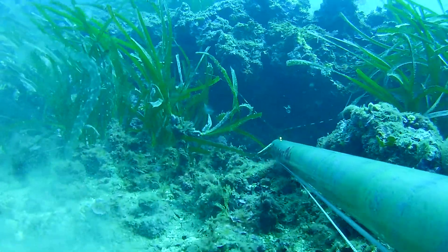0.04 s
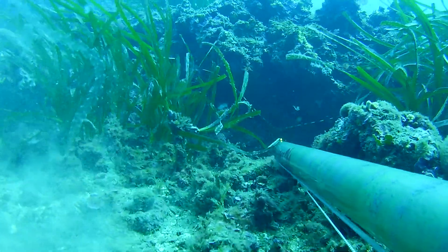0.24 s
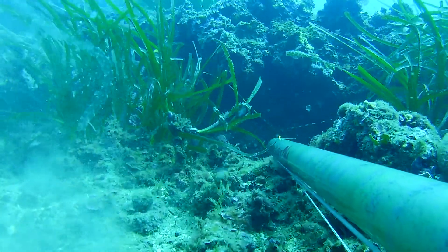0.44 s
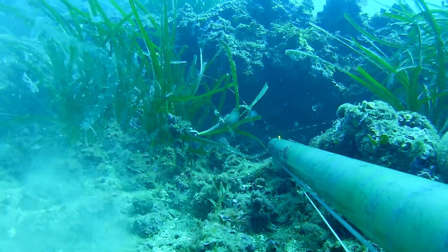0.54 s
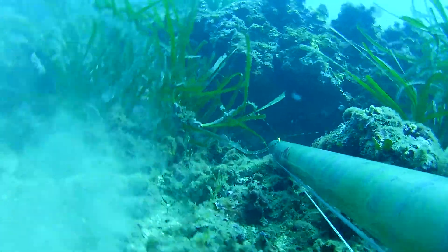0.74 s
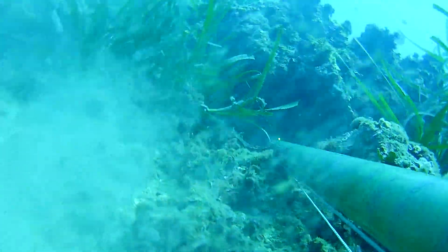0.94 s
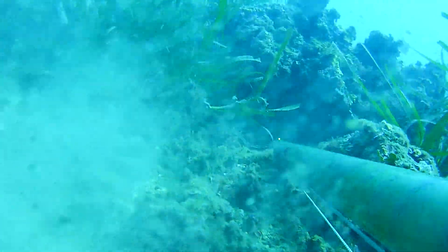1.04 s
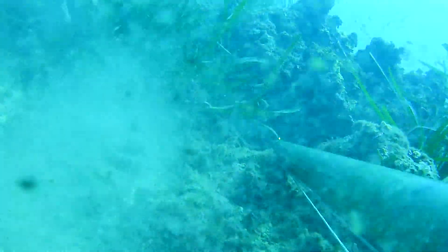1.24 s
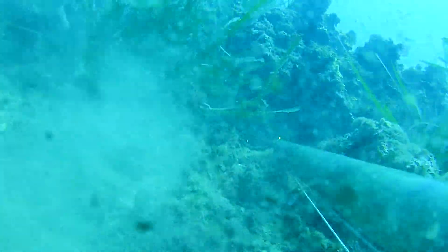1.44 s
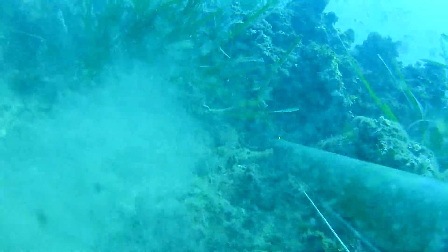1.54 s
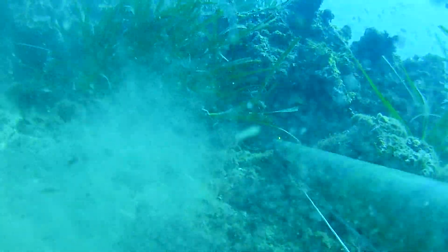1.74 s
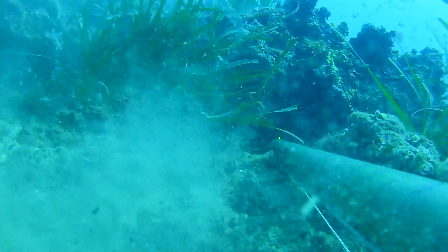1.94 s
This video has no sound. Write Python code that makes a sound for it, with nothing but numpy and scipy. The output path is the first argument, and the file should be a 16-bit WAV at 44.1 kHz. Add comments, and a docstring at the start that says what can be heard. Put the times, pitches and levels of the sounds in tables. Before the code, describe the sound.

Close underwater knocks from a speargun being shifted come in three short bunches, with brief metallic ringing, dull bumps and faint gritty scrapes. Behind them a faraway boat motor drones steadily, and it is left alone at the end.

```python
"""A distant boat motor hums under water, and almost at once a speargun knocks and scrapes on the sea bed.
As the gun is shifted, impacts excite the modes of its steel shaft and of a camera housing fixed to it.
Sliding parts make friction noise, and each shove sets the barrel wobbling in its lowest bending modes.
The motor, a harmonic series over a rush that throbs once a turn, goes on throughout and slowly grows."""
import sys
import numpy as np
from scipy import signal
from scipy.fft import rfft, irfft
from scipy.io import wavfile
from scipy.ndimage import uniform_filter1d

SR = 44100
rng = np.random.default_rng(int(sys.argv[2]) if len(sys.argv) > 2 else 0)


def master_out(mix):
    """Clip the mix to full scale and print it as 16-bit PCM to the path in sys.argv[1]."""
    frames = np.transpose(np.atleast_2d(mix))
    ceiling = np.clip(frames, -1, 1)
    pcm = np.round(ceiling * 32767).astype(np.int16)
    wavfile.write(sys.argv[1], SR, pcm)


N = 88200


def knocks():
    """Impact excitation: housing, fittings and shaft ring freely; a softer contact gives a duller clack. The
    faint rows at 0.821, 1.435 and 1.462 s are hollow rubs rather than blows, voiced the same way."""
    # Each row: start in seconds, clack gain in dB, clack cutoff in Hz, hollow ring gain in dB,
    # ring pitch in Hz, shaft gain in dB.
    contacts = [(.2401, -21, 6000, -48, 730, -56), (.2428, -22, 1720, -45, 705, -20.5),
                (.2492, -17, 6000, -25.5, 722, -25.5), (.256, -16.5, 4500, -38, 720, -28),
                (.2922, -16.5, 1935, -22, 691, -35), (.513, -40, 1220, -38.5, 750, -40.5),
                (.6015, -18, 1560, -19.5, 525, -52.5), (.605, -14.5, 1020, -46, 664, -53.5),
                (.611, -32.5, 790, -18.5, 666, -59), (.653, -36, 1505, -33.5, 692, -47),
                (.6812, -12, 2850, -7.5, 693.2, -55.5), (.6855, -41, 1113, -14.5, 665, -58),
                (.706, -20, 1840, -13.5, 688, -62), (.821, -33.5, 1100, -36, 710, -59),
                (1.051, -23.5, 750, -28, 657, -60), (1.081, -55, 1100, -27.5, 717, -52),
                (1.095, -25, 2040, -30, 572, -61), (1.1036, -18.5, 3040, -21.5, 597, -33),
                (1.1138, -31, 4830, -22, 702, -45), (1.125, -36, 1300, -37, 684, -40),
                (1.1605, -34, 1100, -36, 723, -67), (1.1875, -29.5, 970, -36.5, 740, -53),
                (1.218, -32.5, 1590, -36.5, 699, -53), (1.247, -40, 1410, -63, 673, -63),
                (1.278, -44, 1500, -44, 673, -54), (1.435, -37, 1000, -37, 640, -60),
                (1.462, -54, 1000, -35.5, 679, -68)]
    # Each row: mode frequency in Hz, relative level in dB, time to fall 60 dB in seconds.
    housing_modes = [(336, -30.5, 0.22), (503, -22, 0.075), (773.4, -21, 0.11), (1082, -14.5, 0.043),
                     (1191, -22.5, 0.15), (1436, -12, 0.044), (1710, -29, 0.042), (2030, -14.5, 0.027),
                     (2231, -18.5, 0.054), (3130, -41.5, 0.017), (4353, -25, .04)]
    shaft_modes = [(1225, -12.5, 0.31), (1455, -15.5, 0.18), (1636, 4, 0.04), (2159, -11.5, 0.076),
                   (3195, -25, 0.27), (3440, -28, 0.12), (4720, -27, .04), (7080, -35, 0.057)]
    # The fittings' clatter. Each row: frequency in Hz, relative spectral density in dB.
    clatter_spectrum = [(60, -8), (300, -10), (600, 12), (1100, 2), (1700, 2), (2700, -3.5), (3800, -14),
                        (4800, -13), (6000, -37), (7100, -17.5), (8000, -23.5), (9000, -9.5),
                        (11000, -26.5), (15000, -33)]
    t = np.arange(SR // 2) / SR
    housing, shaft = struck_modes(t, housing_modes), struck_modes(t, shaft_modes)
    burst, tail = amp(-9.5) * decay(t, t60=0.022), amp(-27) * decay(t, t60=0.24)
    track = np.zeros(N)
    for start, clack_db, cutoff_hz, ring_db, ring_hz, shaft_db in contacts:
        clatter = colour(rng.standard_normal(len(t)), clatter_spectrum) * (burst + tail)
        clack = signal.lfilter(*signal.butter(2, cutoff_hz, fs=SR), housing + clatter)
        ring = mode(t, ring_hz, t60=0.066, rise_s=0.0031)
        add(track, start, amp(clack_db) * clack + amp(ring_db) * ring + amp(shaft_db) * shaft)
    return track


def shoves():
    """Bending vibration: after a soft thud the barrel wobbles in its two lowest modes."""
    # Each row: start in seconds, thud gain in dB, thud pitch in Hz, flex gain in dB, sway gain in dB.
    pushes = [(.247, -24, 146, -36.5, -50), (.2605, -20.5, 102, -20, -23.5),
              (.2725, -21.5, 62.3, -41.5, -35), (.318, -27, 74.3, -25.5, -24.5), (.345, -38, 141, -48, -58),
              (.412, -61, 109, -31, -53), (.517, -40, 134, -26.5, -31), (.572, -41, 103, -44, -40),
              (.613, -30, 138.5, -30, -46.5), (.638, -33.5, 132, -26.5, -44.5),
              (.686, -33.5, 204, -55.5, -26), (.77, -59, 97.6, -32.5, -44), (.83, -43.5, 108, -37, -34),
              (.925, -50.5, 121, -44, -40), (.98, -44, 116, -42.5, -46), (1.064, -39, 118, -33, -55),
              (1.10, -30.5, 125, -41, -40), (1.128, -37.5, 130, -30, -32), (1.183, -26, 204, -30, -33),
              (1.265, -67, 140, -43, -36), (1.365, -38.5, 139, -40.5, -47), (1.43, -57, 144, -46.5, -36.5)]
    peak_cycles, rise_s = 0.72, 0.0026
    t = np.arange(SR) / SR
    track = np.zeros(N)
    for start, thud_db, thud_hz, flex_db, sway_db in pushes:
        age = t * thud_hz / peak_cycles  # the thud's envelope peaks at age 1
        thud = age ** 2 * np.exp(2 - 2 * age) * np.sin(2 * np.pi * thud_hz * t)
        flex = mode(t, hz=79.8, t60=0.22, rise_s=rise_s)
        sway = mode(t, hz=37.95, t60=0.41, rise_s=rise_s)
        add(track, start, amp(thud_db) * thud + amp(flex_db) * flex + amp(sway_db) * sway)
    return track


def ticks():
    """Damped resonance: each tiny hard contact rings briefly in a narrow, high band."""
    # Each row: start in seconds, level in dB, pitch in Hz.
    contacts = [(.249, -36, 3570), (.2492, -49, 7180), (.6795, -37, 4430), (.7055, -49.5, 4500),
                (.7925, -58.5, 6600), (1.1045, -30, 2250), (1.1142, -30, 2220), (1.1142, -56, 4600),
                (1.105, -61, 8400), (1.114, -65, 8200), (1.149, -58, 5500)]
    half_width = 0.11  # fraction of the pitch
    t = np.arange(SR // 10) / SR
    track = np.zeros(N)
    for start, db, hz in contacts:
        band = signal.butter(2, [hz * (1 - half_width), hz * (1 + half_width)], "band", fs=SR)
        ring = unit(signal.lfilter(*band, rng.standard_normal(len(t))))
        add(track, start, amp(db) * ring * decay(t, t60=0.019))
    return track


def scrapes():
    """Sliding friction: gritty noise, its level flickering at random, swells and fades."""
    # Each row: start in seconds, length in seconds, level in dB, pitch in Hz.
    slides = [(.199, 0.012, -54, 1620), (.212, 0.043, -51.5, 1490), (.509, 0.036, -57, 1560),
              (.75, 0.094, -53.5, 990), (.931, 0.029, -50.5, 1740), (1.089, 0.0067, -42, 1700),
              (1.116, .022, -46, 1500), (1.27, 0.081, -49.5, 1400), (1.35, 0.028, -49, 2060)]
    # Each row: multiple of the pitch, relative spectral density in dB.
    friction_spectrum = [(.07, -28), (.3, -16), (.5, -0.5), (.7, -3.5), (1, 2), (1.4, -17), (2.4, -29.5),
                         (9, -44.5)]
    grain_db = 5
    t = np.arange(SR // 4) / SR
    track = np.zeros(N)
    for start, length, db, hz in slides:
        grains = amp(grain_db * wander(len(t), span=80))
        spectrum = [(multiple * hz, level) for multiple, level in friction_spectrum]
        grit = colour(grains * rng.standard_normal(len(t)), spectrum)
        swell = np.sin(np.pi * np.minimum(t / length, 1))
        add(track, start, amp(db) * swell * grit)
    return track


def motor():
    """Periodic excitation: rotation gives harmonics of the turning rate and modulates a rush of noise."""
    # Each row: time in seconds, turns per second, then gains in dB of hum, treble, drone and whine.
    running = [(0, 30.3, -3, -3, -13, -2.5), (0.201, 30.0, -3, -3, -8, 3),
               (0.598, 29.95, -3.5, -4, -3.5, -2.5), (1.0, 29.8, -0.5, -5, -6, -4),
               (1.448, 29.7, -1.5, 0.5, 1.5, 0.5), (1.649, 29.6, -1.5, 1, 0.5, -1),
               (1.85, 29.54, -1.5, 2.5, -2.5, 6), (2, 29.5, 0, 2.5, -6, 5.5)]
    # The rush as the water carries it. Each row: frequency in Hz, relative spectral density in dB.
    rush_spectrum = [(20, 3.5), (100, -1.5), (180, 0), (310, 1.5), (440, -1.5), (670, 2.5), (800, -8.5),
                     (1300, -10.5), (1550, -9), (1740, -2), (1930, -14.5), (2080, -9), (2250, -12.5),
                     (2420, -6.5), (2800, -16), (3400, -14.5), (3900, -26.5), (4330, -15), (4720, -27),
                     (5020, -16.5), (5300, -21.5), (5570, -19), (6000, -27.5), (8000, -31), (15000, -52)]
    # Each row: number of a strong harmonic, its level in dB ahead of the band gains.
    strong_harmonics = [(6, -58), (9, -64), (12, -66.5), (20, -65.5), (22, -57), (23, -54.5), (24, -61),
                        (56, -68), (58, -66), (60, -60.5), (72, -70.5), (85, -68.5)]
    rush_gain, tonal_share, waver_depth, throb_depth = amp(-50), 0.49, 0.0011, 0.41
    drone_hz, whine_hz, split_hz = (590, 780), (1600, 1890), 2600
    t = np.arange(N) / SR
    times, *curves = np.transpose(running)
    turn_hz, hum_db, treble_db, drone_db, whine_db = (np.interp(t, times, curve) for curve in curves)
    turns = np.cumsum(turn_hz * (1 + waver_depth * wander(N, span=3000))) / SR
    gains = spectral_gain(np.arange(1, 215) * turn_hz.mean(), rush_spectrum)
    gains *= rush_gain * np.sqrt(tonal_share) / np.linalg.norm(gains)
    for number, db in strong_harmonics:
        gains[round(number) - 1] = amp(db)
    phases = np.exp(2j * np.pi * rng.random(len(gains)))
    one_turn = irfft(np.r_[0, gains * phases], N) * N / np.sqrt(2)
    harmonics = np.interp(turns % 1, np.arange(N) / N, one_turn)
    rush = rush_gain * np.sqrt(1 - tonal_share) * colour(rng.standard_normal(N), rush_spectrum)
    sound = harmonics + rush * (1 + throb_depth * np.cos(2 * np.pi * turns))
    for band_hz, band_db in (drone_hz, drone_db), (whine_hz, whine_db):
        band = signal.filtfilt(*signal.butter(2, band_hz, "band", fs=SR), sound)
        sound += (amp(band_db) - 1) * band
    hum = signal.filtfilt(*signal.butter(2, split_hz, fs=SR), sound)
    return amp(hum_db) * hum + amp(treble_db) * (sound - hum)


def struck_modes(t, table):
    """Modal superposition: resonances struck together add, here with alternating signs."""
    return sum((-1) ** k * amp(db) * mode(t, hz, t60, rise_s=0.0012)
               for k, (hz, db, t60) in enumerate(table))


def mode(t, hz, t60, rise_s):
    """A damped oscillator builds up and dies away."""
    return np.sin(2 * np.pi * hz * t) * decay(t, t60) * (1 - np.exp(-t / rise_s))


def decay(t, t60):
    """Exponential damping: 60 dB down in t60 seconds."""
    return np.exp(-np.log(1000) * t / t60)


def colour(x, spectrum):
    """Spectral shaping: x filtered by the spectrum, at rms 1."""
    hz = np.fft.rfftfreq(len(x), 1 / SR) + 1
    return unit(irfft(rfft(x) * spectral_gain(hz, spectrum), len(x)))


def spectral_gain(hz, spectrum):
    """Frequency response: (Hz, dB) points joined on a logarithmic frequency axis."""
    points_hz, db = np.transpose(spectrum)
    return amp(np.interp(np.log(hz), np.log(points_hz), db))


def wander(size, span):
    """Random fluctuation: noise averaged over span samples, at rms 1."""
    return unit(uniform_filter1d(rng.standard_normal(size), span))


def amp(db):
    """Decibels to amplitude ratio."""
    return 10 ** (np.asarray(db) / 20)


def unit(x):
    """Normalisation to rms 1."""
    return x / np.sqrt(np.mean(x ** 2) + 1e-20)


def add(track, start, sound):
    """Superposes a sound on the track from start seconds."""
    part = track[round(start * SR):][:len(sound)]
    part += sound[:len(part)]


def scene():
    """Superposition: the motor and the handled gear add in one channel."""
    return (motor() + knocks() + ticks() + scrapes() + shoves())[None]


def record(dry):
    """Band limiting: the microphone rolls off the bass, adds hiss and cuts the highest treble."""
    bass_hz, edge_hz, hiss_db = 22, 15720, -72
    wet = signal.lfilter(*signal.butter(2, bass_hz, "high", fs=SR), dry)
    wet += amp(hiss_db) * rng.standard_normal(dry.shape)
    low_pass = signal.firwin(511, edge_hz, window=("kaiser", 9), fs=SR)
    return signal.oaconvolve(wet, low_pass[None], "same")


dry = scene()
out = record(dry)
master_out(out)
```